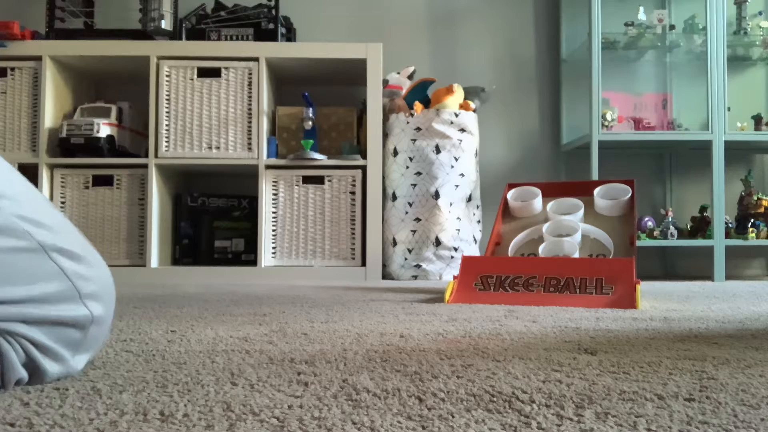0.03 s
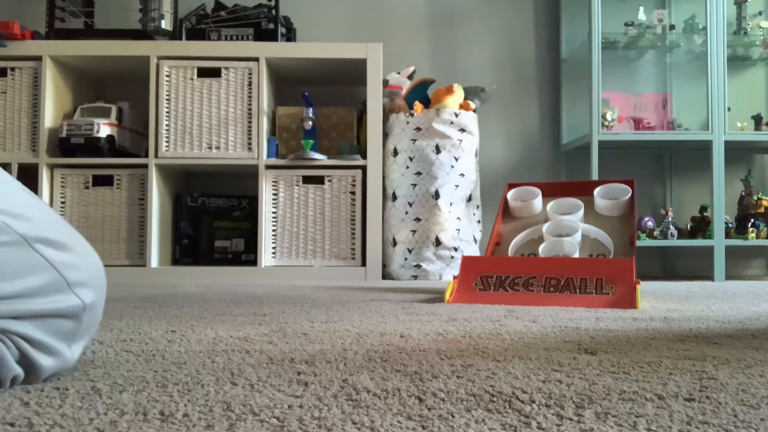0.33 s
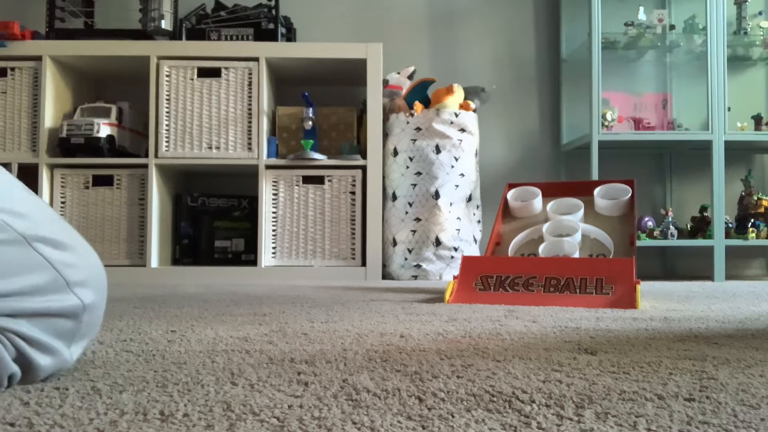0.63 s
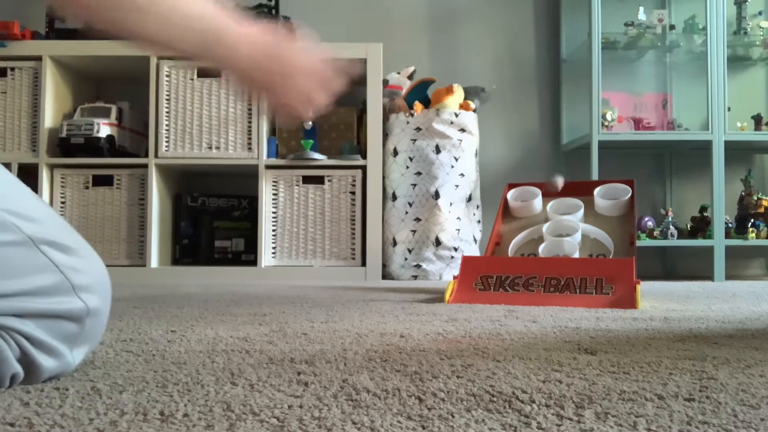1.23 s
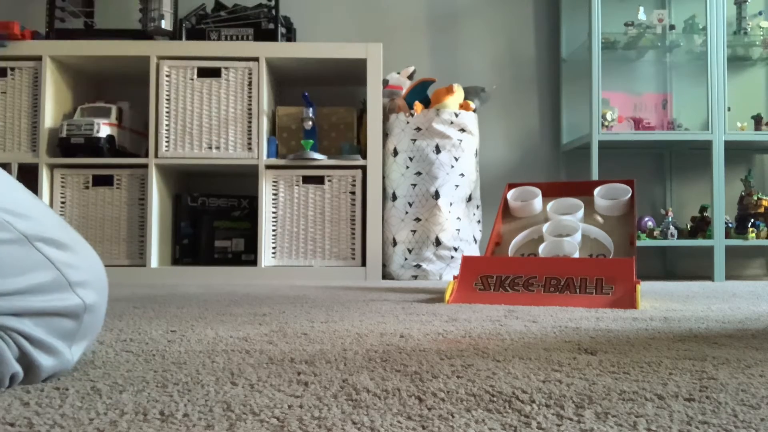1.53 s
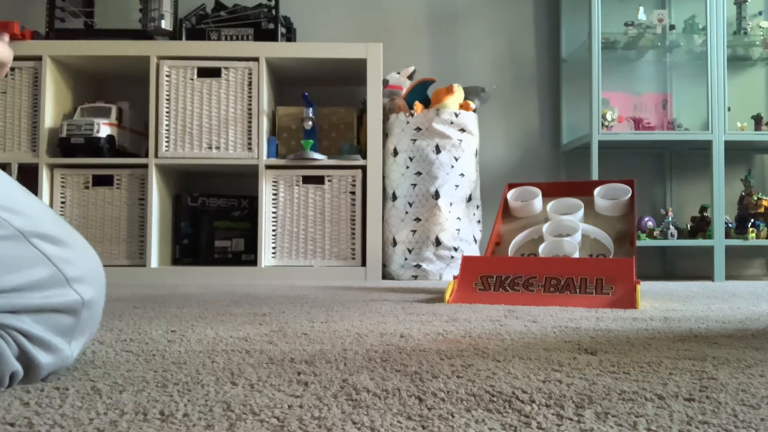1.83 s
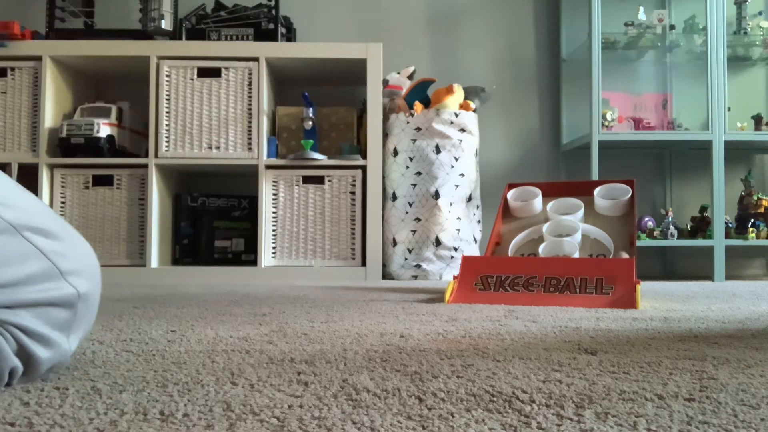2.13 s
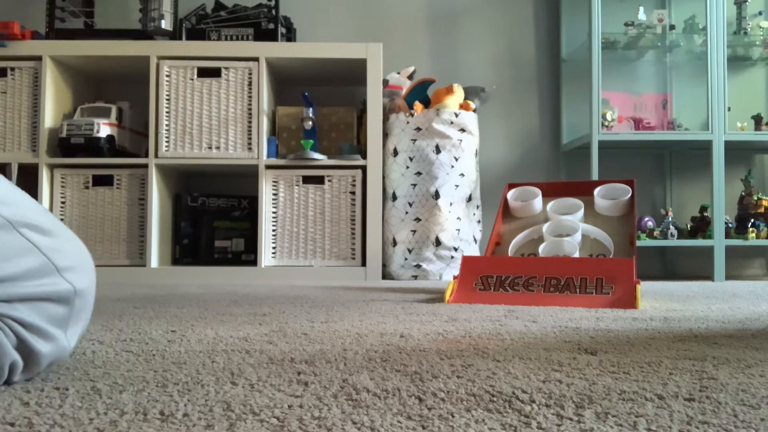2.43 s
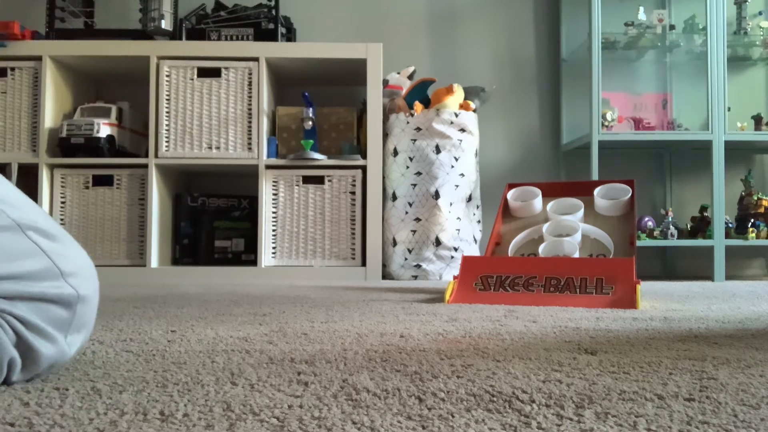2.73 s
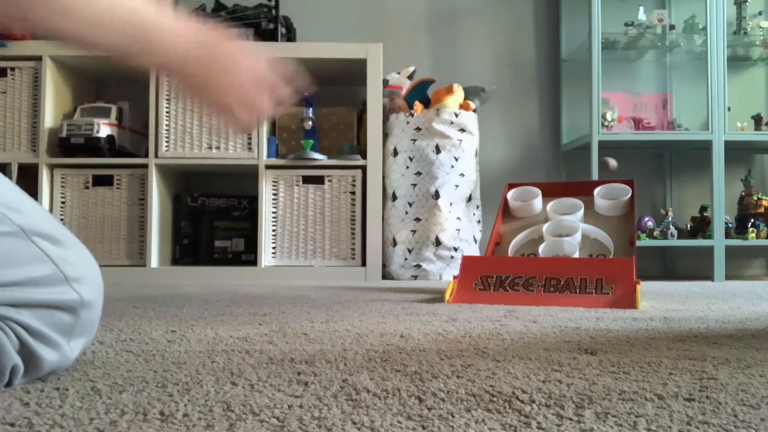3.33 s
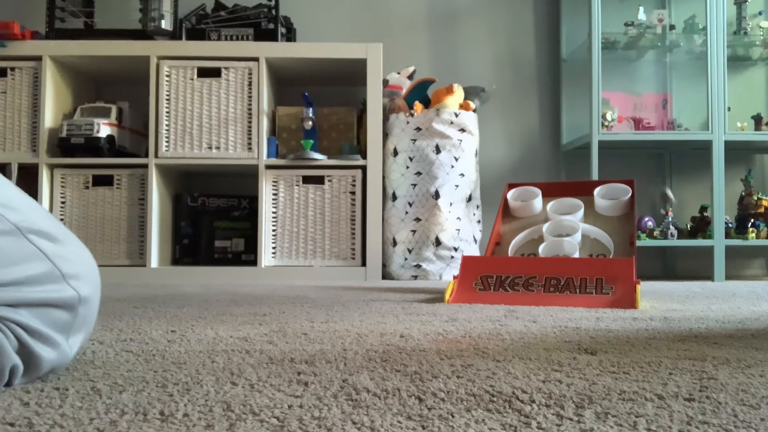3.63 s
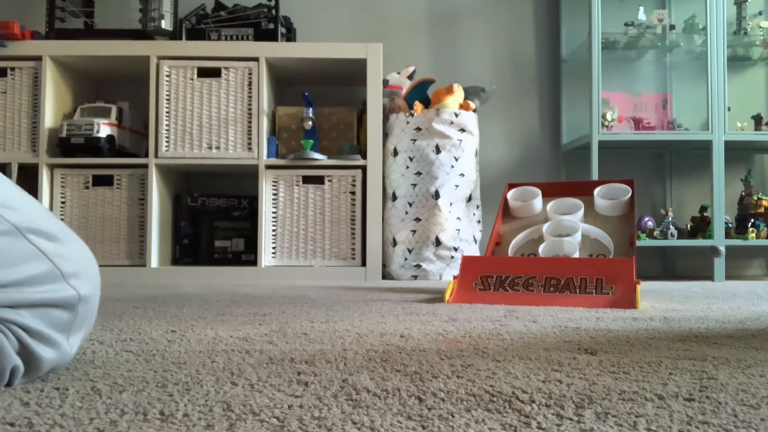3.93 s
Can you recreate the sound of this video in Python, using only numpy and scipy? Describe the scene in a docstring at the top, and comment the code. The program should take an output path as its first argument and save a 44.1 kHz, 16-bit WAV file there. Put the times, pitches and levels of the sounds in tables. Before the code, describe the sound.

Sharp knocks of small balls on wood and plastic, heard from across a quiet carpeted room. One ball bounces and rattles down through cups and rings; another bounces, cracks against a wooden panel and drops softly onto the carpet.

```python
"""Two small balls knock on a wooden skee-ball board, heard from one microphone across a carpeted room.
Each bounces off the ramp; the first strikes a plastic cup and rattles down through the rings, the second
cracks against the back panel and drops on the carpet. Every blow is a brief chattering contact that rings
wood or plastic, and the walls throw it back. A faint, dull scuff comes before the first throw;
underneath lie soft rustles, room rumble and mains hum."""
import sys
import numpy as np
from scipy import signal
from scipy.fft import rfft, irfft
from scipy.io import wavfile
from scipy.ndimage import uniform_filter1d

SR = 44100
rng = np.random.default_rng(int(sys.argv[2]) if len(sys.argv) > 2 else 0)


def log_audio(samples):
    """Write samples as a 16-bit WAV file to the path given in sys.argv[1]."""
    # one column per channel
    frames = np.atleast_2d(samples).T
    # limit to full scale, then quantise
    limited = np.clip(frames, -1, 1)
    pcm = np.round(limited * 32767).astype(np.int16)
    wavfile.write(sys.argv[1], SR, pcm)


N = 176400

# Brief contacts: t/s, level/dB, bass/dB, low-mid/dB, treble/dB, top/dB (these four against the mids),
# chatter decay/ms, direct sound/dB, wall echoes/dB
RAMP_HITS = [(1.1713, 7.5, -3.5, 2, 3.5, 0.5, 0.39, -9.5, 1.5),
             (3.2083, 11.5, -6, 2.5, 3.5, 6, 0.69, -11, 1)]
SCUFF_AND_BOARD_HITS = [(.137, -31, 0, 0, -15, -23, 6.5, -10.5, -2),
                        (1.6567, 10.5, -5, 5, 3, 5, 2.75, -7, -0.5),
                        (1.9478, -5.5, -13.5, 9.5, 1, 7, 1.22, -6, -4),
                        (2.007, -6, 5.5, 10, 5, 2, 3.3, -7, 0.5), (2.150, -6, 11, 5, 4.5, -11, 1.7, -8, 5),
                        (2.501, -4.5, 8, 2.5, 4.5, 4.5, 3.5, -14, 1.5),
                        (2.680, -16.5, 16, 13.5, -30, -31.5, 0.15, -8, 1.5)]  # first row: a faint, dull scuff before the first throw
BACK_PANEL_HITS = [(3.5696, 20.4, -8.5, -7.5, 4.7, 2.5, 1.79, -7, 0.88)]
BOARD_TICKS = [(2.182, -19.5, -10, -7, 9, -4, 0.13, 6.9, -8),
               (3.446, -21, -11, -12.5, -3.5, -13, 0.58, 3.6, -6.5)]  # light dry clicks
TOP_CUP_HITS = [(1.534, 16.1, 0.0084, 0.5, 1.5, 0, 2.9, -7, -1.5)]
RING_HITS = [(1.861, -8, 0, 2.6, -1, -20, 2.9, 4.9, 7.7), (2.071, -10, 1.7, 5, -12, -20, 3.3, 6.3, 8.9)]
LOW_CUP_HITS = [(2.275, 1.16, 6.8, 0.0072, 1.3, -2, 1, -8, 2.4)]
# Colour of each material: f/Hz, level/dB
RAMP_COLOUR = [(40, -8), (90, 5.5), (190, 8.5), (360, 1), (750, 0.5), (1400, -2), (2400, -2.5),
               (3300, -12.5), (6000, -12.5), (9000, -16), (15000, -29)]
WOOD_COLOUR = [(40, -3.5), (170, -5.5), (330, -1), (500, -2), (1200, -3), (2600, -2), (3400, -8.5),
               (5200, -14), (9500, -23), (15000, -41)]
PLASTIC_COLOUR = [(40, -15), (200, -0.5), (500, -4), (1200, 0), (1650, -6), (2900, -4.5), (3350, -12.5),
                  (5500, -12.5), (10000, -17.5), (15000, -32.5)]
# Resonances of each part: f/Hz, width/Hz, level/dB against the colour
RAMP_MODES = [(161, 5.1, -3.5), (218, 11, 6), (402, 25, 5), (639, 50, -3)]
BOARD_MODES = [(288.4, 16, 10), (415, 15, 12), (564, 10, 7), (834, 23, 4.1), (1184, 180, 5),
               (1930, 150, 2.7)]
BACK_PANEL_MODES = [(286, 20, 13), (413, 36, 10.6), (630, 26, 7.4), (1141, 90, 8.2), (1400, 33, 7.3),
                    (1780, 85, 3), (2145, 74, 4), (2450, 200, 2.8)]
TOP_CUP_MODES = [(280, 6.7, 12), (590, 27, 5.3), (704, 33, 2.2), (990, 68, 6.8), (1050, 370, 7.7),
                 (1380, 40, 3.1), (2030, 47, 5.9), (2430, 250, 7.1), (2700, 70, 10), (2860, 110, 10.3)]
RING_MODES = [(408, 27, 9.4), (542, 13, 9.9), (825.6, 15, 27), (1409, 29, 21.6), (1770, 50, 17),
              (1900, 52, 11)]
LOW_CUP_MODES = [(670, 88, 12), (824, 53, 15.6), (1025, 39, 16.6), (1094, 21, 12.8), (2470, 54, 9),
                 (2610, 31, 8.7), (3360, 120, 12)]
# Treble hidden from the microphone, by the front panel (ramp) and the rim (other parts): f/Hz, level/dB
PANEL_SHADOW = [(400, 4.5), (1200, -5), (3500, -10.5), (12000, -11)]
RIM_SHADOW = [(400, 2.5), (1200, -1), (3500, -3.5), (12000, -7)]
# Thumps of bending wood: t/s, level/dB, final f/Hz, swell/s
FLEX_THUMPS = [(1.17, -23, 169, 0.0033), (1.533, -22.5, 108, 0.0033), (1.657, -21, 370, 0.0048),
               (2.6786, -35, 196, 0.0069), (3.2073, -18.5, 131, 0.0075), (3.571, -23.5, 285.4, 0.013)]
# Dull thuds on the carpet: t/s, level/dB, f/Hz, decay/s
CARPET_THUDS = [(0.127, -48, 294, 0.0029), (0.462, -53, 164, 0.0069), (2.401, -44.5, 104, 0.014),
                (3.9, -32.5, 156, 0.0033), (3.915, -37, 261.4, 0.0062), (3.931, -29.5, 81.5, 0.011)]
# The ball rolling on the board: t/s, level/dB
ROLL_LEVELS = [(1.70, -66), (1.80, -52.5), (2.02, -40.5), (2.16, -47), (2.26, -71), (2.48, -80),
               (2.58, -71), (2.651, -61), (2.72, -63), (2.85, -86)]
# Rustles of clothes and carpet: t/s, half-length/s, level/dB, centre f/Hz
RUSTLES = [(0.882, .08, -84.5, 5100), (1.094, 0.031, -80, 7500), (2.996, 0.027, -71, 1454),
           (2.998, 0.054, -80.5, 7000), (3.008, 0.059, -57, 199.1), (3.935, 0.058, -66, 1100),
           (3.925, 0.05, -73.5, 5000)]
# Reverberation of the room: f/Hz, T60/s
ROOM_T60 = [(100, 0.55), (250, 0.48), (500, 0.41), (2000, 0.36), (6000, 0.39), (10000, 0.33), (15000, 0.23)]
# Wall and ceiling echoes at the microphone: delay/s, and level/dB for each delay
ECHO_DELAYS = [.0119, .0148, .0202, .0322]
ECHO_LEVELS = [-11.5, -6.5, -12.5, -10]
# Spectrum of the room's rumble and hiss: f/Hz, relative level/dB
ROOM_TONE = [(25, -41), (38, -23.5), (52, -4), (90, -13), (125, -1.5), (160, -14.5), (270, -15), (340, -35),
             (430, -26.5), (540, -45), (900, -44), (3000, -51), (4800, -53), (8800, -45), (12000, -57.5),
             (16000, -67)]

BASS_HZ, LOW_MID_HZ, MID_HZ, HIGH_MID_HZ, TREBLE_HZ, TOP_HZ = 141, 401.7, 1140, 2400, 7490, 13000
SIZE = 32768  # samples in one contact and its tail
T, HZ = np.arange(SIZE) / SR, np.fft.rfftfreq(SIZE, 1 / SR)
SCENE_T, SCENE_HZ = np.arange(N) / SR, np.fft.rfftfreq(N, 1 / SR)
FADE = np.clip(3 * (1 - T / T[-1]), 0, 1) ** 2  # closes the last third of a tail


def contacts(events, colour, modes, shadow, scatter_db, scatter_s=0.011):
    """A knock or scuff rings a part, heard at the microphone directly, off furniture and via the room."""
    out, part = np.zeros(N), part_gain(colour, modes)
    shade = minimum_phase(amp(curve(shadow, HZ)))
    for s, db, bass_db, low_mid_db, treble_db, top_db, chatter_ms, direct_db, echo_db in events:
        tone_db = curve([(BASS_HZ, bass_db), (LOW_MID_HZ, low_mid_db), (MID_HZ, 0), (HIGH_MID_HZ, 0),
                         (TREBLE_HZ, treble_db), (TOP_HZ, top_db)], HZ)
        ring = minimum_phase(part * amp(db + tone_db))
        chatter = rfft(burst(chatter_ms / 1000))
        furniture = amp(scatter_db) * rfft(burst(scatter_s))  # scatter from close to the board
        paths = amp(direct_db) * shade * (1 + furniture) + room(echo_db)
        add(out, s, irfft(ring * chatter * paths) * FADE)
    return out


def part_gain(colour, modes):
    """Gain of a ringing part: its material's colour with resonances standing out."""
    peaks = sum(amp(db) ** 2 / (1 + (2 * (HZ - hz) / width) ** 2) for hz, width, db in modes)
    return amp(curve(colour, HZ)) * np.sqrt(1 + peaks)


def burst(decay_s):
    """Chatter or scatter: dying noise with an even spectrum and an energy of one."""
    envelope = np.exp(-T / decay_s)
    noise = rng.standard_normal(SIZE) * envelope
    gate = np.minimum(10 * envelope, 1)  # keeps the burst short as it is evened out
    for _ in range(3):
        noise = whiten(noise, bins=40) * gate
    return noise / np.linalg.norm(noise)


def wood_flex(start_hz=883, fall_s=0.00272):
    """The wood bends under the ball; its bending wave arrives treble first, as a falling thump."""
    out = np.zeros(N)
    for s, db, end_hz, swell_s in FLEX_THUMPS:
        hz = end_hz + (start_hz - end_hz) * np.exp(-T / fall_s)
        swell = T / swell_s * np.exp((1 - (T / swell_s) ** 2) / 2)
        add(out, s, amp(db) * swell * np.sin(2 * np.pi * np.cumsum(hz) / SR))
    return out


def carpet_thuds(room_db=-9):
    """Soft low blows on the carpeted floor, with a little of the room."""
    out = np.zeros(N)
    for s, db, hz, decay_s in CARPET_THUDS:
        envelope = 2 * T / decay_s * np.exp(-T / decay_s)
        add(out, s, amp(db) * envelope * np.sin(2 * np.pi * hz * T))
    return out + amp(room_db) * signal.fftconvolve(out, irfft(room()))[:N]


def rolling(bumps_per_s=500, dull_hz=2500):
    """Tiny bumps under the rolling ball keep the board murmuring."""
    bumps = rng.standard_normal(N) * (rng.random(N) < bumps_per_s / SR)
    board = minimum_phase(part_gain(WOOD_COLOUR, BOARD_MODES))
    ring = irfft(board * room() / (1 + 1j * HZ / dull_hz)) * FADE
    level_db = np.interp(SCENE_T, *np.transpose(ROLL_LEVELS), left=-140, right=-140)
    return amp(level_db) * unit(signal.fftconvolve(bumps, ring)[:N])


def rustles(width_octaves=0.71, flutter_depth=0.16):
    """Clothes and carpet rustle in soft, fluttering swells of noise."""
    out = np.zeros(N)
    for s, half_s, db, centre_hz in RUSTLES:
        octaves = np.log2((SCENE_HZ + 1) / centre_hz)
        hiss = shaped_noise(np.exp(-(octaves / width_octaves) ** 2 / 2))
        out += amp(db) * hiss * np.exp(-((SCENE_T - s) / half_s) ** 2)
    flutter = unit(uniform_filter1d(rng.standard_normal(N), size=400))
    return out * (1 + flutter_depth * flutter)


def room(echo_db=0, onset_s=0.0074, rise_s=0.0055, tail_db=1.5):
    """The room's spectrum at the microphone: hard echoes and a diffuse tail, new for each contact."""
    mid_t60 = curve(ROOM_T60, MID_HZ)
    envelope = np.clip((T - onset_s) / rise_s, 0, 1) * amp(-60 * T / mid_t60)
    tail = whiten(rng.standard_normal(SIZE) * envelope, bins=44) * np.clip(T / onset_s - .5, 0, 1)
    hz, t, bands = signal.stft(tail, SR, nperseg=256)
    bands *= amp(-60 * t * (1 / curve(ROOM_T60, hz)[:, None] - 1 / mid_t60))  # each band has its own T60
    response = amp(tail_db) * signal.istft(bands, SR)[1][:SIZE] * FADE ** 2
    for delay_s, db in zip(ECHO_DELAYS, ECHO_LEVELS):
        response[round(delay_s * SR)] += amp(db + echo_db)
    return rfft(response)


def room_tone(air_db=-60.5, hum_hz=115.2, hum_db=-62, waver=0.36):
    """Low rumble, faint hiss and a wavering mains hum around the microphone."""
    air = shaped_noise(amp(curve(ROOM_TONE, SCENE_HZ)))
    drift = shaped_noise(np.exp(-SCENE_HZ / 3))
    hum = unit((1 + waver * drift) * np.sin(2 * np.pi * hum_hz * SCENE_T))
    return amp(air_db) * air + amp(hum_db) * hum


def amp(db):
    """Decibels to gain."""
    return 10 ** (np.asarray(db) / 20)


def unit(x):
    """Scales to an rms of one."""
    return x / np.sqrt(np.mean(x ** 2) + 1e-20)


def curve(points, hz):
    """Reads a table on a log-frequency axis."""
    f, value = np.transpose(points)
    return np.interp(np.log(hz + 1), np.log(f + 1), value)


def add(mix, s, sound):
    """Mixes a sound in at time s."""
    part = mix[round(s * SR):][:len(sound)]
    part += sound[:len(part)]


def minimum_phase(gain):
    """The spectrum of the promptest ring with this gain."""
    log_gain = np.log(np.maximum(gain, 1e-6))
    mirrored = np.r_[log_gain, log_gain[-2:0:-1]]
    return np.exp(np.conj(signal.hilbert(mirrored)))[:len(gain)]


def whiten(x, bins):
    """Evens out a sound's spectrum, dividing by its average over neighbouring bins."""
    spectrum = rfft(x)
    power = abs(uniform_filter1d(abs(spectrum) ** 2, bins))
    return irfft(spectrum / np.sqrt(power + 1e-12))


def shaped_noise(gain):
    """Steady noise with this spectral shape and an rms of one."""
    return unit(irfft(rfft(rng.standard_normal(N)) * gain, N))


def scene():
    """Both throws, heard in mono from across the room."""
    wood = (contacts(RAMP_HITS, RAMP_COLOUR, RAMP_MODES, PANEL_SHADOW, scatter_db=9) + wood_flex()
            + contacts(SCUFF_AND_BOARD_HITS, WOOD_COLOUR, BOARD_MODES, RIM_SHADOW, scatter_db=7.5)
            + contacts(BACK_PANEL_HITS, WOOD_COLOUR, BACK_PANEL_MODES, RIM_SHADOW, scatter_db=3)
            + contacts(BOARD_TICKS, WOOD_COLOUR, BOARD_MODES, RIM_SHADOW, scatter_db=-12))
    cups = (contacts(TOP_CUP_HITS, PLASTIC_COLOUR, TOP_CUP_MODES, RIM_SHADOW, scatter_db=4)
            + contacts(RING_HITS, PLASTIC_COLOUR, RING_MODES, RIM_SHADOW, scatter_db=-2)
            + contacts(LOW_CUP_HITS, PLASTIC_COLOUR, LOW_CUP_MODES, RIM_SHADOW, scatter_db=6.5))
    return (wood + cups + carpet_thuds() + rolling() + rustles() + room_tone())[None]


def record(dry):
    """The microphone's low cut and the recorder's band limit."""
    low_cut = signal.butter(N=3, Wn=59.4, btype="high", fs=SR, output="sos")
    band_limit = signal.firwin(511, cutoff=15850, window=("kaiser", 9), fs=SR)
    return signal.oaconvolve(signal.sosfilt(low_cut, dry), band_limit[None], "same")


dry = scene()
out = record(dry)
log_audio(out)
```